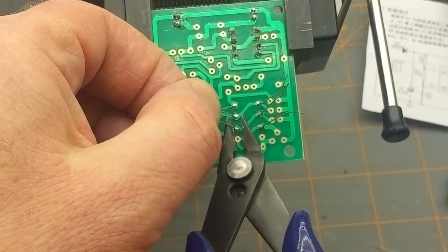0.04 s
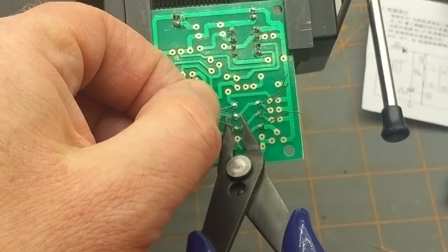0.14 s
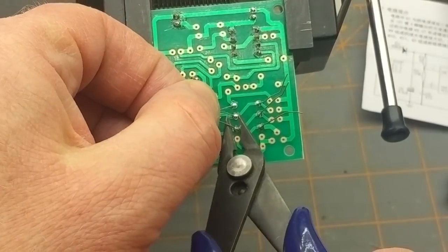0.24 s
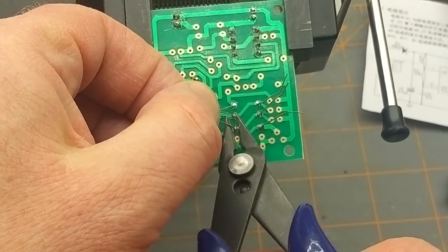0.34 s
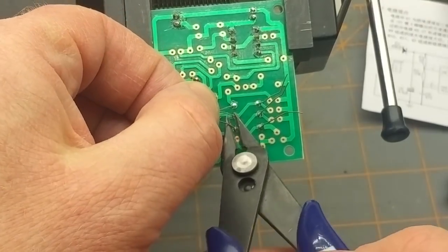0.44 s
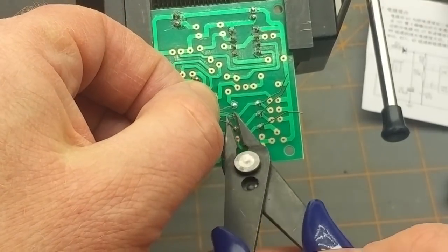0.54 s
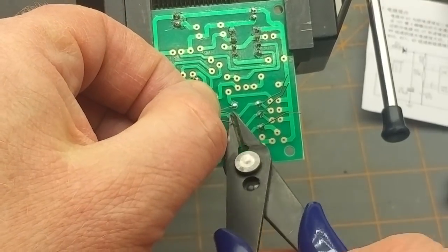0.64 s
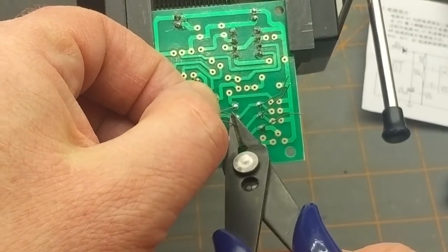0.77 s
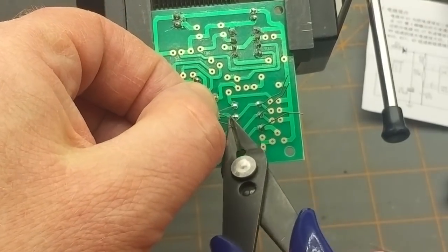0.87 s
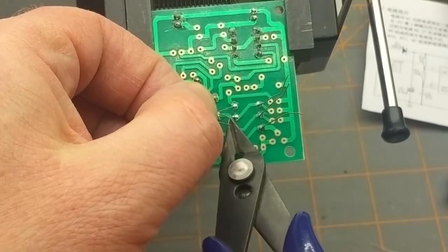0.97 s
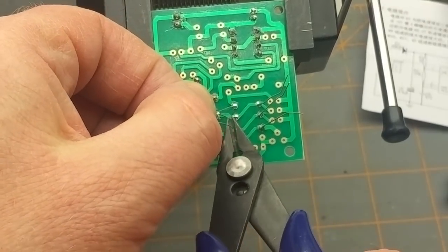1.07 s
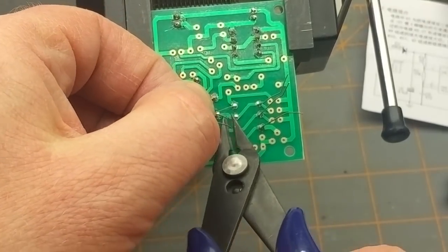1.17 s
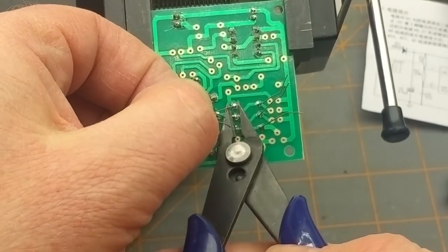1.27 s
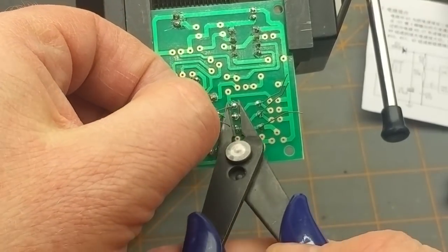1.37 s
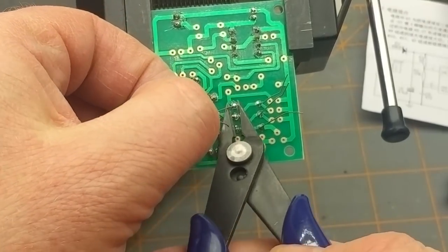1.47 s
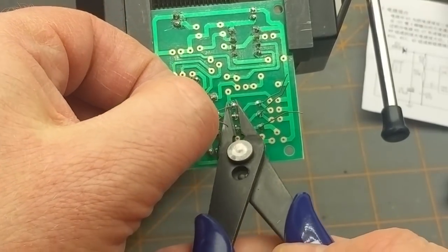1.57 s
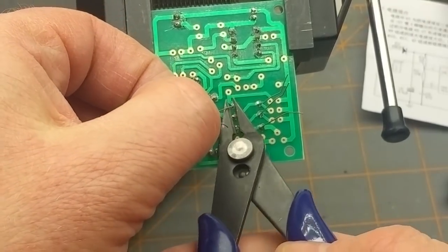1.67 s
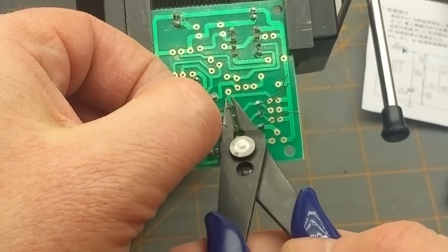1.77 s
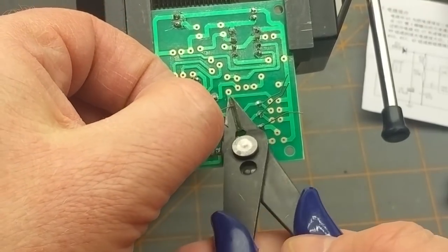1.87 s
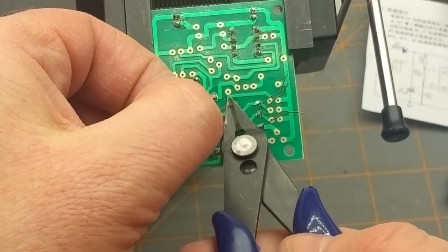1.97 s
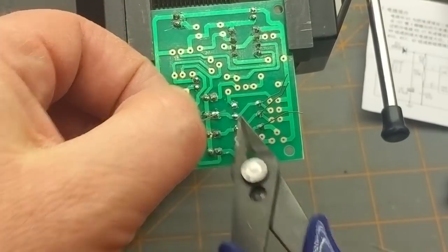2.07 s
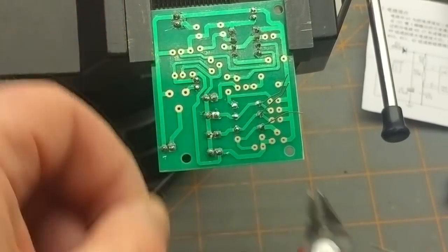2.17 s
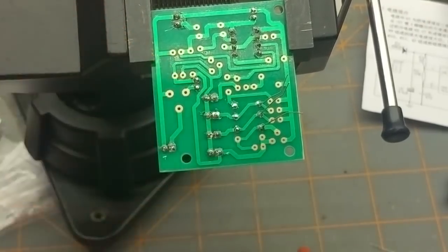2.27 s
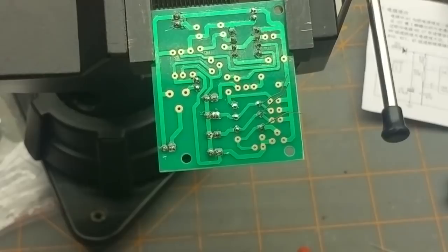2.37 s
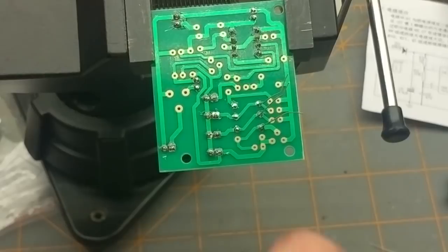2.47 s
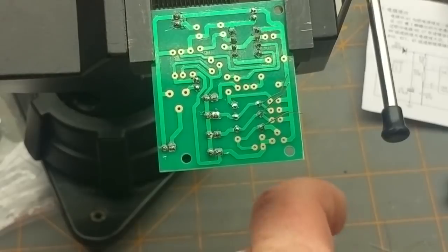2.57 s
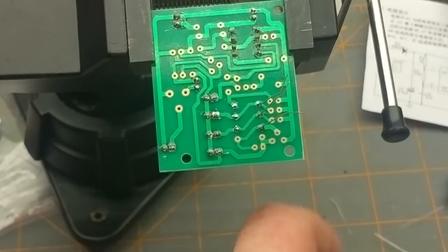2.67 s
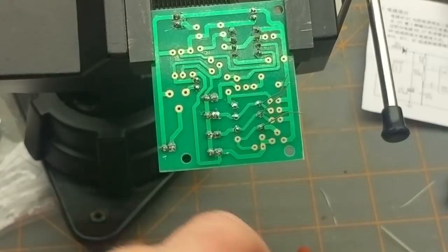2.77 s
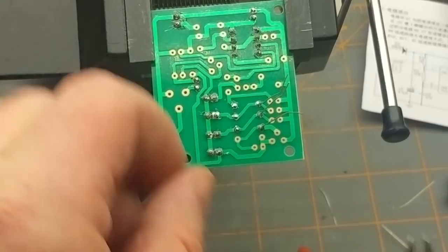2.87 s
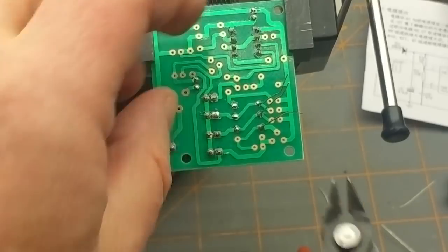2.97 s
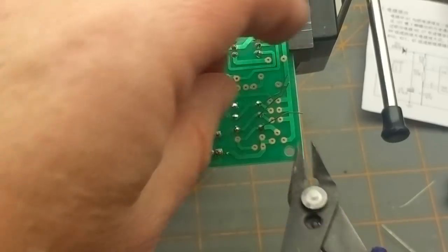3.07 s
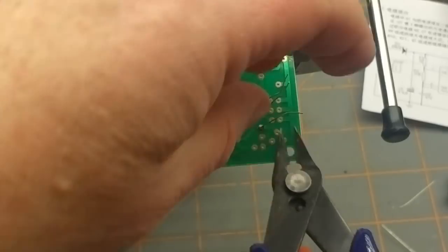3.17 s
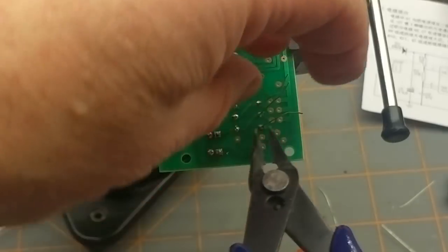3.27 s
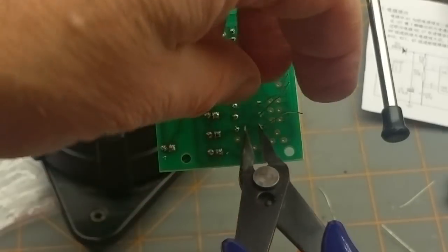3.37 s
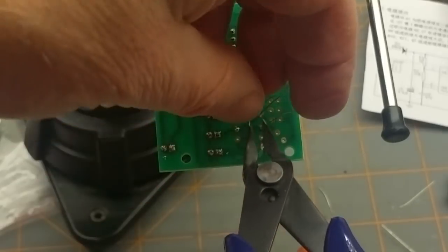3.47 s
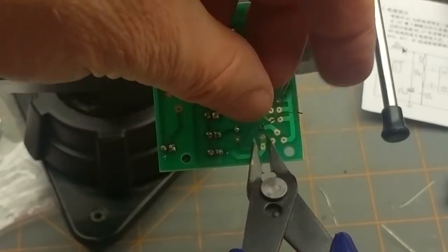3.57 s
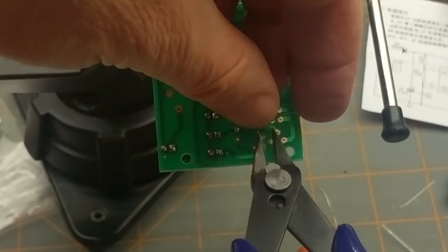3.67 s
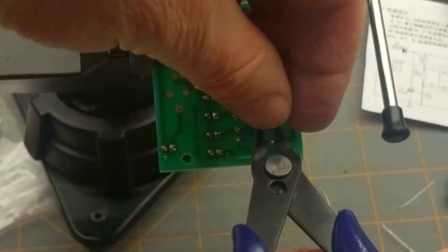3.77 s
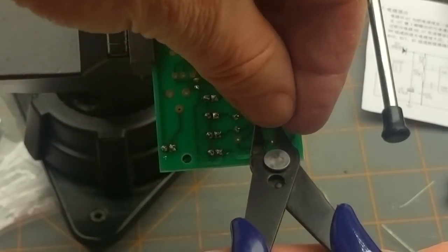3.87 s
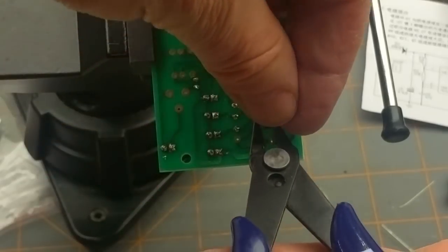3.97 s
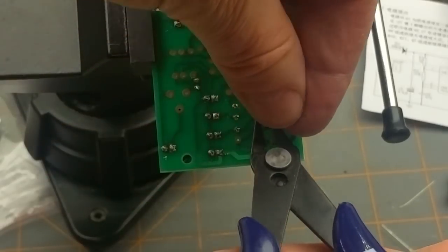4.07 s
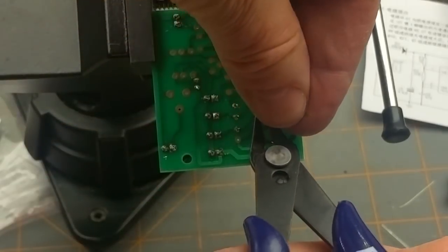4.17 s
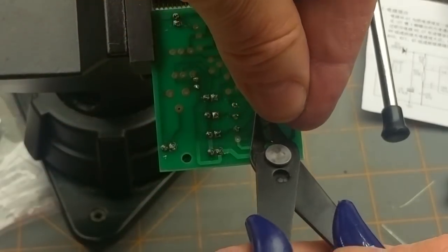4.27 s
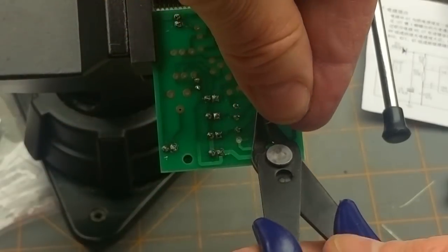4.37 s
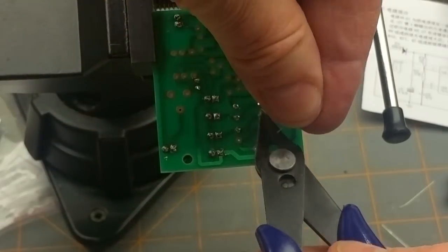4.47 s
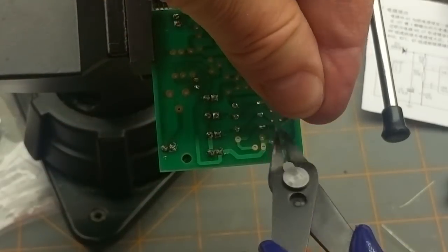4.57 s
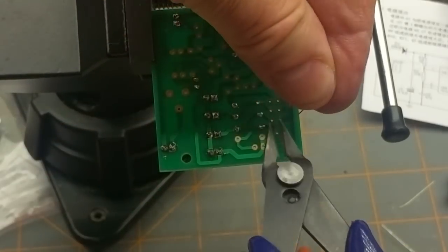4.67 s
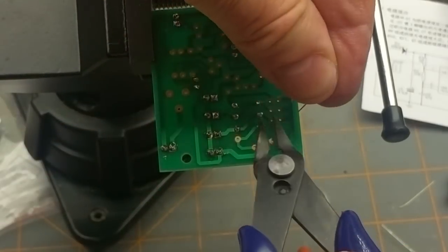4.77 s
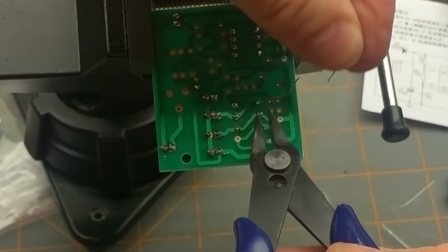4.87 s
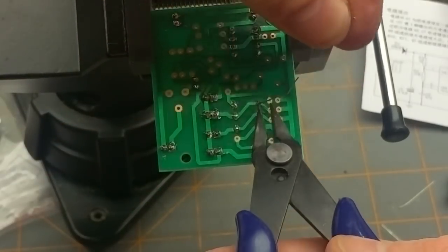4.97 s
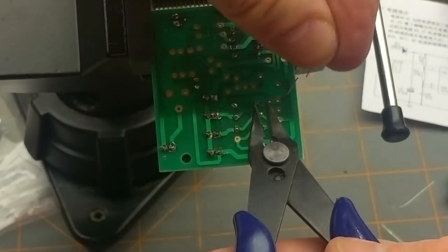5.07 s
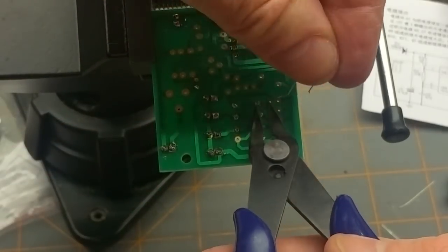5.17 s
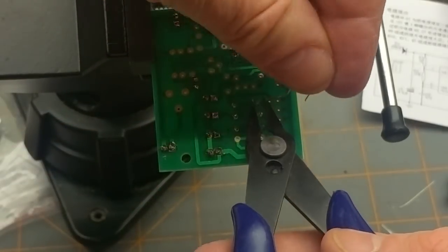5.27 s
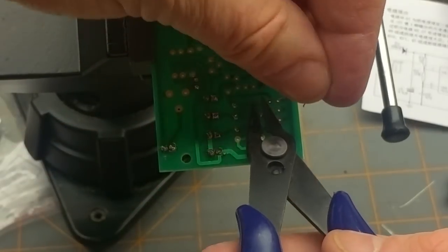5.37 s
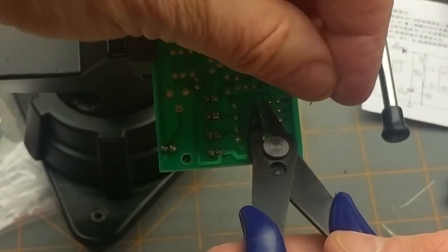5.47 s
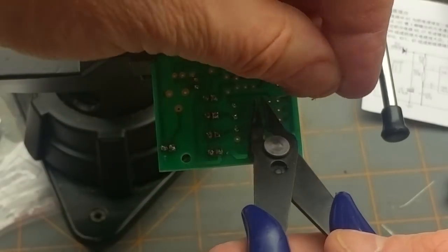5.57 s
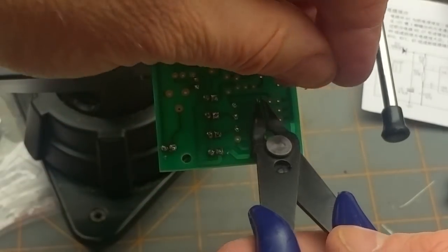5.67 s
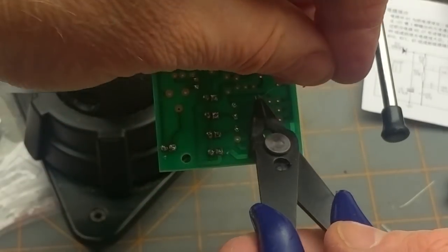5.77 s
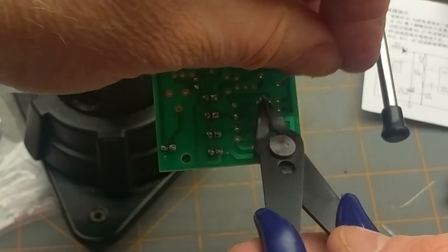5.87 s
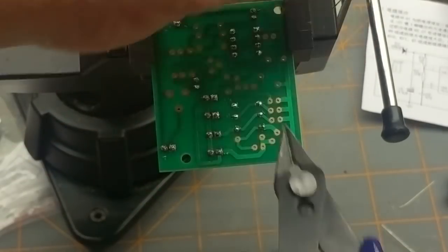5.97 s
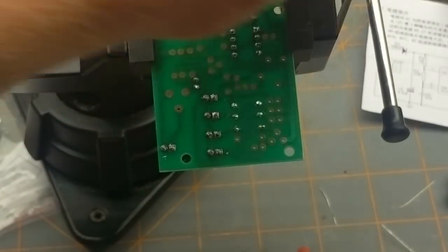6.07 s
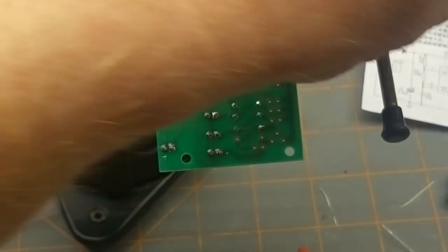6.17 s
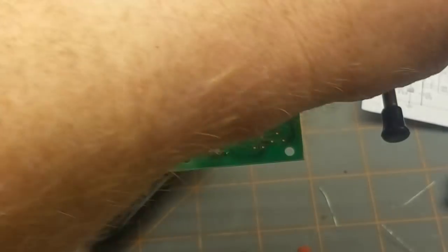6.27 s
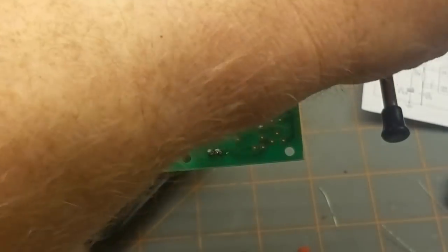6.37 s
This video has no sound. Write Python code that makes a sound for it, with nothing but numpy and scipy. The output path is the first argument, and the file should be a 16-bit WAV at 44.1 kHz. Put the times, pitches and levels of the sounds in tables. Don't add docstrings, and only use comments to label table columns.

```python
import sys
import numpy as np
from scipy import signal
from scipy.fft import rfft, irfft, next_fast_len
from scipy.io import wavfile
from scipy.ndimage import uniform_filter1d, map_coordinates

SR = 44100
rng = np.random.default_rng(int(sys.argv[2]) if len(sys.argv) > 2 else 0)


def magnitude_from_level(level_db):
    exponent = np.asarray(level_db, float) / 20
    return 10 ** exponent


def unload_audio(sound):
    columns = np.transpose(np.atleast_2d(sound))
    steps = np.round(np.clip(columns, -1, 1) * 32767)
    wavfile.write(sys.argv[1], SR, steps.astype(np.int16))


N = 283637
SPAN = 12288

# start_s, level_db (peak), sharpness_db
JOLTS = [(0.673, -55.5, -5), (0.826, -31.5, -15.5), (0.909, -36, -7), (1.152, -46.5, -7),
         (1.376, -44.5, -15.5), (1.731, -56, -7), (1.828, -56, -6), (1.89, -53.5, -7.5), (1.987, -34, -10),
         (2.143, -47.5, -4), (3.557, -48.5, -31), (3.604, -56, -6.5), (3.76, -42.5, -9.5),
         (3.813, -53.5, -7), (3.882, -54.5, 4), (3.931, -57, 1), (4.221, -63, -8), (4.27, -58.5, -5),
         (4.457, -28, -14.5), (4.583, -47.5, -17), (5.057, -42.5, 1.5), (5.149, -50, -19), (5.186, -44, -6),
         (5.357, -53, -28), (5.461, -42, -5.5), (5.691, -45, -9), (5.854, -32, -5.5), (5.957, -50.5, -21)]
# centre_hz, width_hz, level_db
PRESSED_BOARD = [(1377, 1000, -25), (500, 51, 1), (910, 55, -1), (1320, 190, -4), (1667, 200, -6)]
# centre_hz, width_hz, level_db
FREED_BOARD = [(1700, 310, -7), (1303, 152, 4.5), (950, 90, -2), (470, 110, -9.5), (286, 160, 1.5)]
# centre_hz, width_hz, level_db
JAW_SNAP = [(3560, 680, 2), (2160, 1300, -13), (2904, 340, 4.5), (4250, 270, -6), (4900, 270, -36)]
# centre_hz, width_hz, level_db
BRIGHT_EDGE = [(10400, 21000, 36.5), (6670, 4800, -22), (11200, 1000, -16), (16400, 910, -25.5)]


def unit(x):
    return x / np.sqrt(np.mean(x ** 2) + 1e-20)


def along(points, hz):
    f, v = np.transpose(points)
    return np.interp(np.log(hz + 1), np.log(f + 1), v)


def wobble(rate):
    knots = rng.standard_normal(int(N * rate / SR) + 4)
    return map_coordinates(knots, [np.arange(N) * rate / SR])


def noise(spectrum):
    m = next_fast_len(N)
    gain = magnitude_from_level(along(spectrum, np.fft.rfftfreq(m, 1 / SR)))
    return unit(irfft(rfft(rng.standard_normal(m)) * gain, m)[:N])


def add(track, s, sound):
    part = track[round(s * SR):][:len(sound)]
    part += sound[:len(part)]


def resonate(x, modes, scatter_db, low_hz, top_hz):
    def cut(hz):
        return 1 - (f / hz) ** 2 + 1j * np.sqrt(2) * f / hz

    f = np.fft.rfftfreq(len(x), 1 / SR)
    response = 0
    for hz, width, db in modes:
        gain = magnitude_from_level(db + scatter_db * rng.standard_normal())
        response = response + gain * 1j * f * width / (hz * hz - f * f + 1j * f * width)
    response *= (f / low_hz) ** 2 / cut(low_hz) / cut(top_hz) ** 2
    y = irfft(rfft(x) * response, len(x))[:len(x) // 2]
    return y / np.sqrt(uniform_filter1d(y ** 2, size=128).max())


def floor():
    # pitch_hz, level_db (peak)
    hum_tones = [(120, -74), (360.5, -81), (830, -88), (945, -81)]
    # pitch_hz, density_db (per Hz)
    rumble_colour = [(13, -43), (22, -11), (68, -4.5), (87, -7.5), (129, -3), (182, -8.5), (400, -13.5),
                     (520, -10), (880, -120)]
    # pitch_hz, density_db (per Hz)
    hiss_colour = [(150, -9), (300, -4), (950, -6), (1700, -7.5), (3000, -13.5), (4000, -15.5), (5000, -7),
                   (5900, -18.5), (7300, -19.5), (9500, -14), (11500, -12.5), (16800, -16), (17300, -25.5),
                   (18500, -48)]
    t = np.arange(N) / SR
    hum = np.zeros(N)
    for hz, db in hum_tones:
        hum += magnitude_from_level(db + 2 * wobble(5)) * np.sin(2 * np.pi * hz * t + .4 * wobble(4))
    busy = sum(np.exp(-((t - s) / 0.086) ** 2) for s, *_ in JOLTS)
    rumble = magnitude_from_level(-72.5 + 2.15 * busy + 1.8 * wobble(14)) * noise(rumble_colour)
    hiss = magnitude_from_level(-69 + 0.38 * wobble(2.65)) * noise(hiss_colour)
    return hum + rumble + hiss


def drone():
    # start_s, level_db
    passing = [(0.08, -74), (0.22, -62.5), (.5, -63), (0.68, -73), (1.3, -62), (1.55, -60.5),
               (2.351, -60.5), (2.55, -67.5), (3.3, -70.5)]
    start_hz, sink_hz_per_s = 122, 17.5
    s, db = np.transpose(passing)
    t = np.arange(N) / SR
    turns = np.cumsum(start_hz - sink_hz_per_s * t + 1.43 * wobble(39)) / SR
    level_db = np.interp(t, s, db) - 0.5
    upper = magnitude_from_level(level_db + 2.5 * wobble(11)) * np.sin(2 * np.pi * turns)
    lower = magnitude_from_level(-65.5 - 14.6 * t + 3 * wobble(6.3)) * np.sin(2 * np.pi * .7 * turns)
    fade_out = np.clip((s[-1] - t) / 0.15, 0, 1)
    return fade_out * (upper + lower)


def rubs():
    # start_s, level_db, pitch_hz, width_hz, length_s
    strokes = [(0.691, -64, 1560, 470, 0.024), (1.381, -63.5, 860, 141, 0.022),
               (1.412, -59.5, 760, 330, 0.012), (1.279, -67, 1900, 910, 0.037),
               (2.1, -61.5, 2680, 2700, 0.059), (2.104, -58.5, 2630, 150, 0.038),
               (2.109, -57, 750, 220, 0.043), (2.114, -49.5, 1584, 45, 0.035),
               (2.199, -66, 900, 700, 0.125), (2.73, -64, 3800, 2600, 0.078),
               (3.595, -67.5, 1190, 55, 0.019), (3.863, -64, 1310, 60, 0.039),
               (3.923, -67, 1320, 60, 0.027), (4.578, -61.5, 443, 119, 0.03), (4.929, -64, 416, 80, 0.048),
               (5.286, -70, 1350, 200, 0.035)]
    out, t = np.zeros(N), np.arange(SPAN) / SR
    for s, db, hz, width, length in strokes:
        stroke = np.sin(np.pi * np.clip(t / length, 0, 1))
        grains = rng.standard_normal(SPAN) * magnitude_from_level(3.6 * rng.standard_normal(SPAN))
        sound = resonate(stroke * grains, [(hz, width, 0)], 0, low_hz=hz / 2, top_hz=hz + width + 600)
        add(out, s, magnitude_from_level(db) * sound)
    return out


def bench():
    # pitch_hz, t60_s, strength_group
    bench_modes = [(119, .14, 0), (215, .1, 1), (165, .05, 2), (280, .07, 2), (345, .06, 2), (480, .06, 2),
                   (104, .2, 3), (140, .12, 3)]
    out, t = np.zeros(N), np.arange(SPAN) / SR
    swell = magnitude_from_level(2.5) * (1 - np.exp(-t / 0.0085)) ** 2
    for s, db, sharp_db in JOLTS:
        strength = magnitude_from_level([db + 5, db + 5.5 + 0.69 * sharp_db, db + sharp_db, db - 9.5])
        ring = np.zeros(SPAN)
        for hz, t60, group in bench_modes:
            detuned_hz = hz * (1 + .02 * rng.standard_normal())
            ring += strength[group] * magnitude_from_level(-60 * t / t60) * np.sin(2 * np.pi * detuned_hz * t)
        add(out, s - .003, ring * swell)
    no_sway = signal.butter(3, 62, "high", fs=SR, output="sos")
    return signal.sosfilt(no_sway, out)


def jaws():
    # start_s, low_mode_db, middle_mode_db, high_mode_db
    pings = [
        (0.822, -44.5, -61.5, -60),
        (3.597, -59.5, -55, -57),
        (4.453, -67, -68, -68),
        (4.929, -71, -70, -54),
        (4.943, -71, -74, -55),
        (5.852, -52, -63, -64),
    ]
    # pitch_hz, t60_s
    bar_modes = [(3150, .19), (8450, .05), (16500, .035)]
    out, t = np.zeros(N), np.arange(SPAN) / SR
    for s, *levels in pings:
        for db, (hz, t60) in zip(levels, bar_modes):
            chatter = np.cumsum(hz / 60000 * rng.standard_normal(SPAN))
            beat = 1 + .5 * np.cos(2 * np.pi * (28 * t + rng.random()))
            tone = np.sin(2 * np.pi * hz * t + chatter) * (1 - np.exp(-t / .003))
            add(out, s, magnitude_from_level(db - 60 * t / t60) * beat * tone)
    return out


def room(x, wet_db):
    # pitch_hz, t60_s
    decay = [(200, 0.48), (1500, 0.13), (5000, 0.14), (14000, 0.125)]
    hz, t, z = signal.stft(rng.standard_normal(SPAN), SR, nperseg=256)
    tail = signal.istft(z * magnitude_from_level(-60 * t / along(decay, hz)[:, None]), SR, nperseg=256)[1]
    tail = np.pad(tail, (round(0.005 * SR), 0))[:len(x)]
    power = np.abs(rfft(x)) ** 2
    colour = np.sqrt(np.abs(uniform_filter1d(power, size=80)))
    return x + magnitude_from_level(wet_db) * irfft(rfft(tail / np.linalg.norm(tail), len(x)) * colour, len(x))


def contacts(events, snap, edge, board, t60, wet_db):
    out, t = np.zeros(N), np.arange(SPAN) / SR
    lag_s, scatter_db = 0.0007, 2
    for s, db, knock_db, edge_db, crack_db in events:
        roughness_db = 2.18 * rng.standard_normal(SPAN)
        force = magnitude_from_level(-60 * t / t60 + roughness_db) * rng.standard_normal(SPAN)
        force[0] = magnitude_from_level(crack_db)
        sound = resonate(force, snap, scatter_db, low_hz=1730, top_hz=6540)
        sound += magnitude_from_level(edge_db) * resonate(force, edge, scatter_db, low_hz=5070, top_hz=17800)
        sound += magnitude_from_level(knock_db) * resonate(force, board, scatter_db, low_hz=313, top_hz=2760)
        add(out, s + lag_s, magnitude_from_level(db) * room(sound, wet_db))
    return out


def offcuts():
    # start_s, level_db (peak), edge_db, crack_db (over rattle)
    landings = [(2.7048, -50, -15, 14), (2.717, -52.5, -1.5, 14), (2.7218, -52, -23, 7),
                (2.729, -60, -8, 14), (2.733, -60, -12, 11), (2.7387, -48, -16, 30), (2.768, -66, -19, 3),
                (2.785, -62, -1, 12), (2.806, -68, -10, 14), (2.816, -65, -4, 12), (2.855, -66, -10, 6),
                (2.862, -62.5, -6, 3), (2.896, -64, -10, 17), (6.3853, -43, -4, 2), (6.4014, -53, -10, 10),
                (6.4083, -54, -3, 15)]
    # centre_hz, width_hz, level_db
    wire = [(4300, 1700, 4), (5000, 420, 4), (3070, 650, -12)]
    knock_db = -10.5
    bounces = [(s, db, knock_db, edge_db, crack_db) for s, db, edge_db, crack_db in landings]
    return contacts(bounces, wire, BRIGHT_EDGE, FREED_BOARD, t60=0.023, wet_db=-6)


def touches():
    # start_s, level_db (snap peak), knock_db (board)
    taps = [(0.7034, -64, 3), (0.9787, -62.5, 3.5), (0.997, -60, -3), (1.08, -59, -2), (1.1524, -58, 5.5),
            (1.3653, -68.5, 6), (1.8349, -64, 3.5), (2.125, -58, 4), (2.1707, -55.5, -3),
            (3.7577, -72.5, 16.5), (3.8677, -64, -5), (3.923, -73.5, 13), (4.2692, -69, 13.5),
            (4.67, -54.5, -9), (5.1866, -72.5, 9), (5.429, -73, 16), (5.684, -63.5, 8), (5.9491, -72, 12),
            (6.0797, -55.5, -5)]
    edge_db, crack_db = -15, 19
    events = [(*tap, edge_db, crack_db) for tap in taps]
    return contacts(events, JAW_SNAP, BRIGHT_EDGE, PRESSED_BOARD, t60=.028, wet_db=-7.5)


def dull_cuts():
    # start_s, level_db (snap peak), knock_db (board), edge_db, crack_db (over rattle)
    cuts = [
        (0.907, -41.5, 1.5, -20, 17.5),
        (1.9822, -41, 6, -13.5, 8),
        (3.5963, -60, -17, -3, 8),
        (4.4502, -34, 0.5, -9, -15),
        (5.0498, -59.5, 15, -7, -18),
        (5.46, -56.5, 9, -19, 15),
    ]
    return contacts(cuts, JAW_SNAP, BRIGHT_EDGE, PRESSED_BOARD, t60=.032, wet_db=-13)


def clean_snips():
    # start_s, level_db (snap peak), knock_db (board), edge_db, crack_db (over rattle)
    deep_snips = [
        (.8203, -19.5, -7.5, -3, 22.4),
    ]
    tip_snips = [
        (5.8473, -20, -6, 0, 18.3),
    ]
    # centre_hz, width_hz, level_db
    tip_snap = [(4140, 1300, 3.5), (5100, 800, 1), (2620, 230, -5), (3250, 220, -11)]
    # centre_hz, width_hz, level_db
    tip_edge = [(11000, 6300, -14), (11670, 880, 2.5), (7760, 1000, -12), (15800, 1900, 3)]
    deep = contacts(deep_snips, JAW_SNAP, BRIGHT_EDGE, FREED_BOARD, t60=.03, wet_db=-13.5)
    tips = contacts(tip_snips, tip_snap, tip_edge, FREED_BOARD, t60=0.033, wet_db=-14.5)
    return deep + tips


def scene():
    background = floor() + drone()
    handling = rubs() + bench() + jaws()
    cutting = offcuts() + touches() + dull_cuts() + clean_snips()
    return (background + handling + cutting)[None]


def band_limit(x):
    return signal.sosfilt(signal.butter(12, 19290, fs=SR, output="sos"), x)


def record(dry):
    top_cut = signal.cheby2(12, 70, 19000, fs=SR, output="sos")
    mix = signal.sosfilt(top_cut, dry) - .0004
    return band_limit(mix)


dry = scene()
out = record(dry)
unload_audio(out)
```